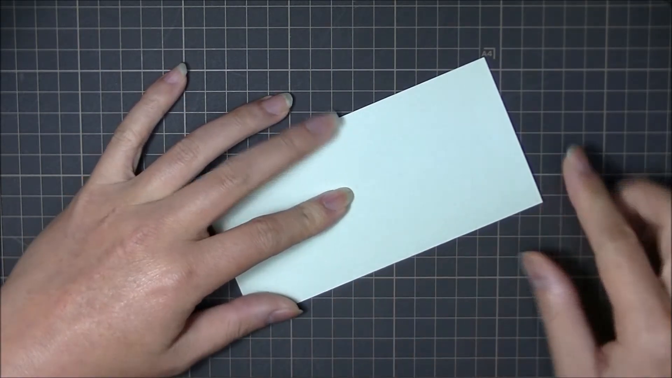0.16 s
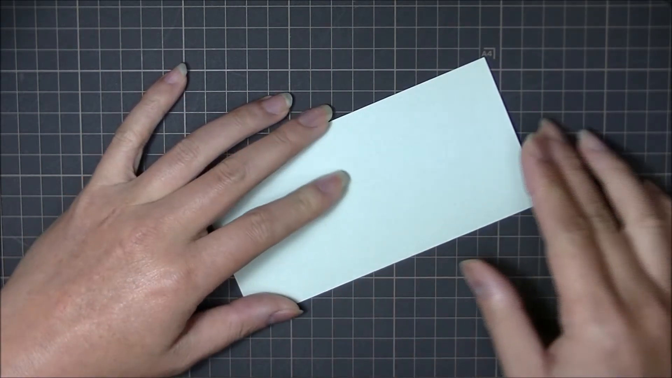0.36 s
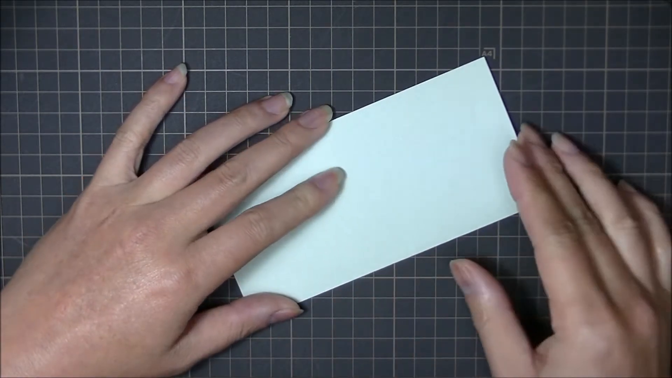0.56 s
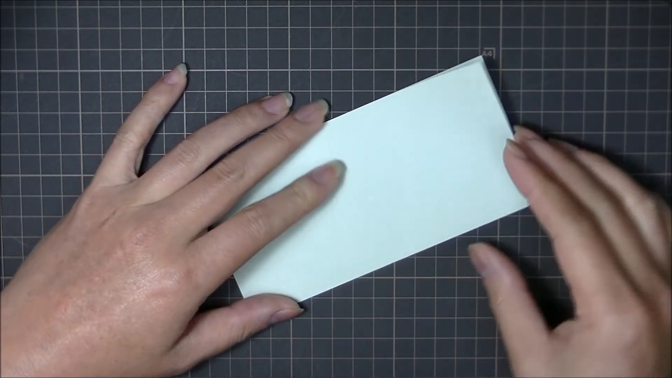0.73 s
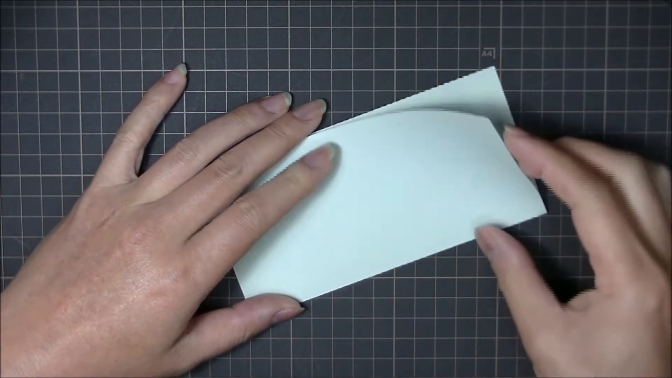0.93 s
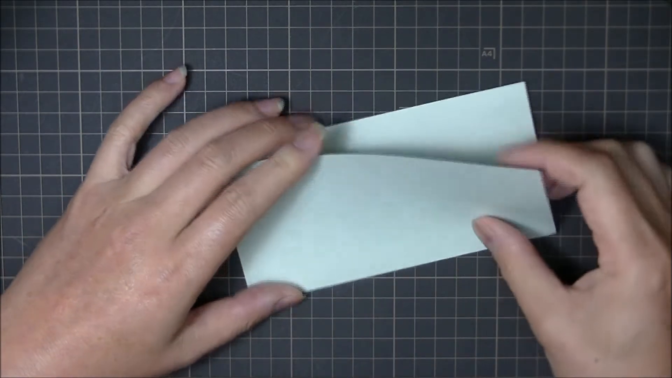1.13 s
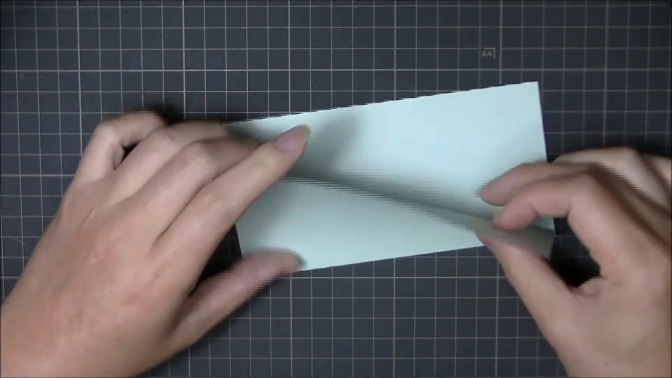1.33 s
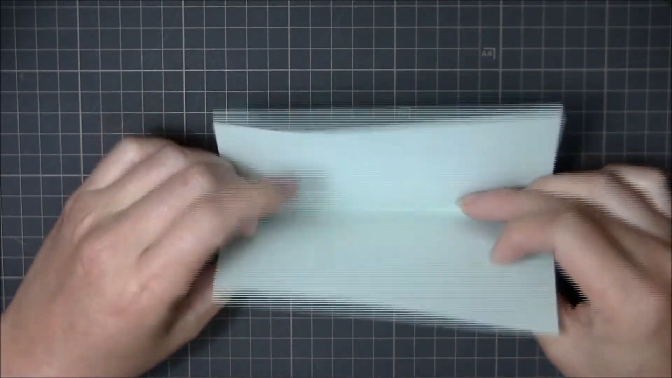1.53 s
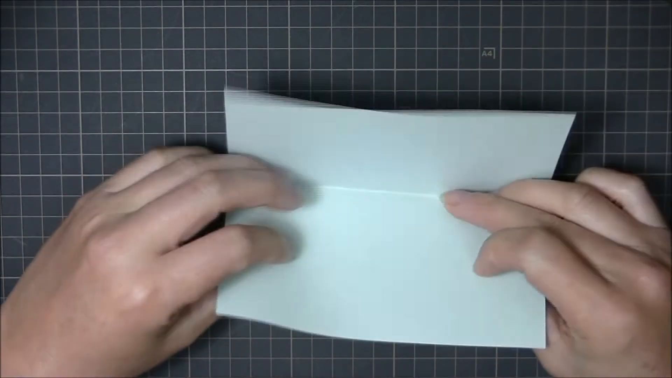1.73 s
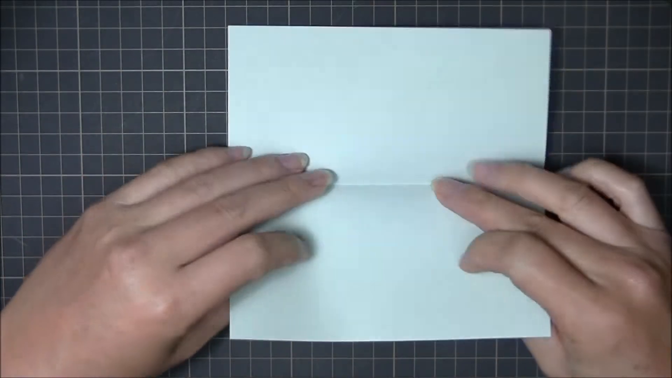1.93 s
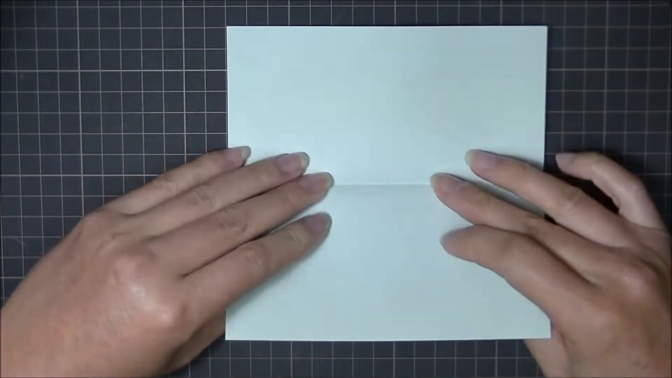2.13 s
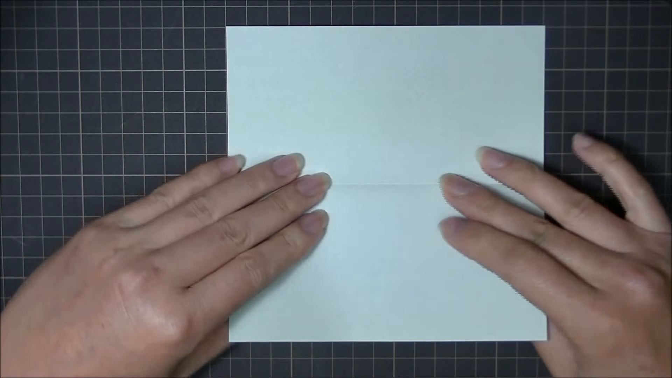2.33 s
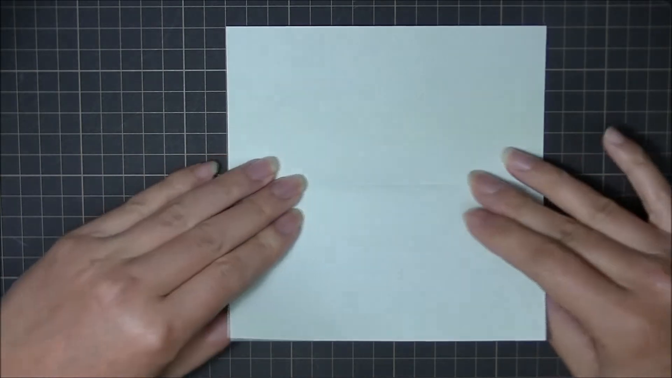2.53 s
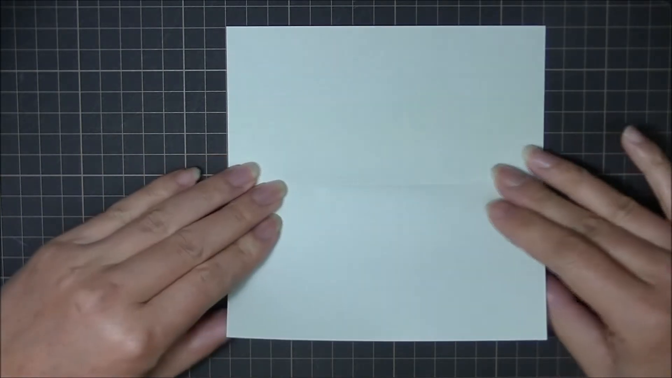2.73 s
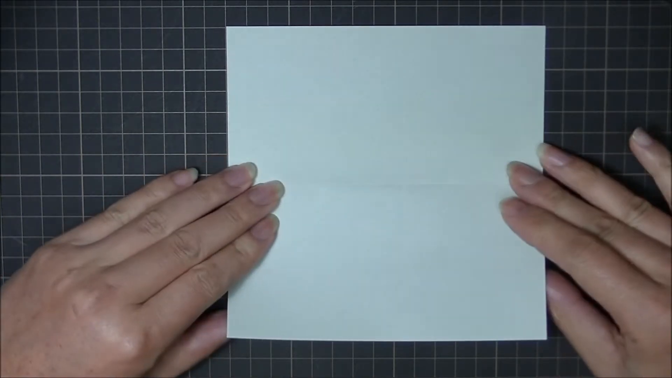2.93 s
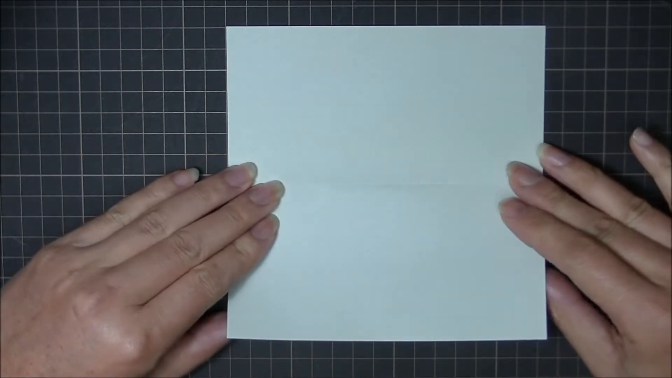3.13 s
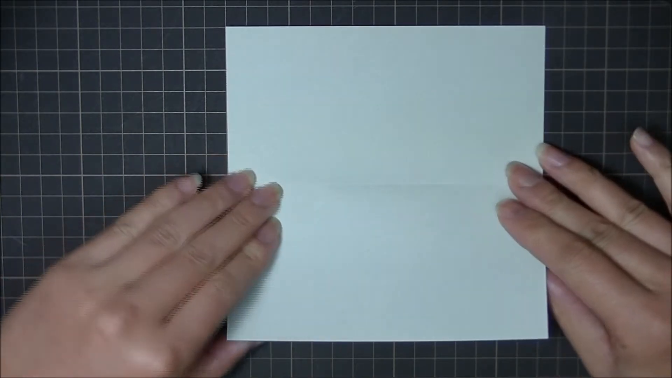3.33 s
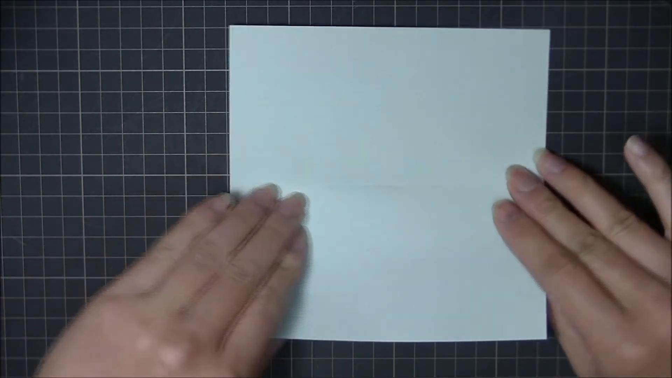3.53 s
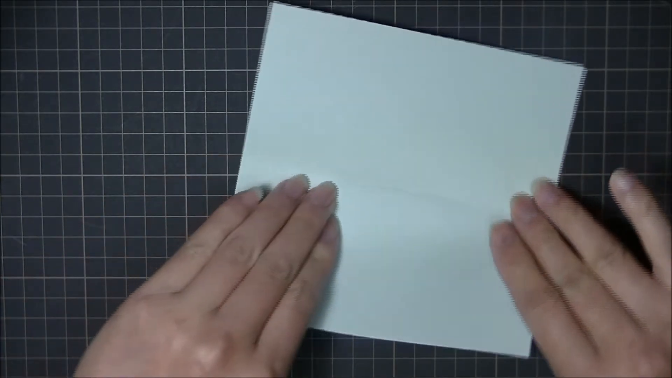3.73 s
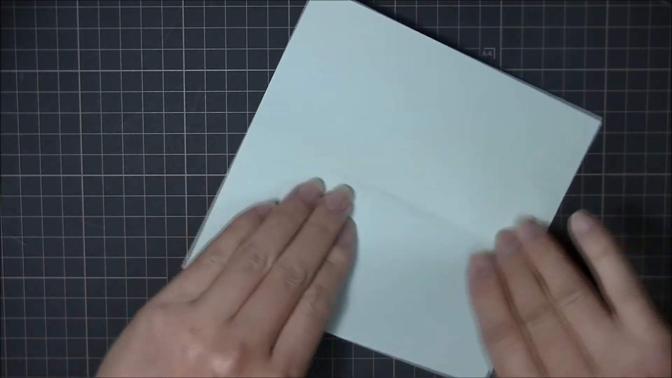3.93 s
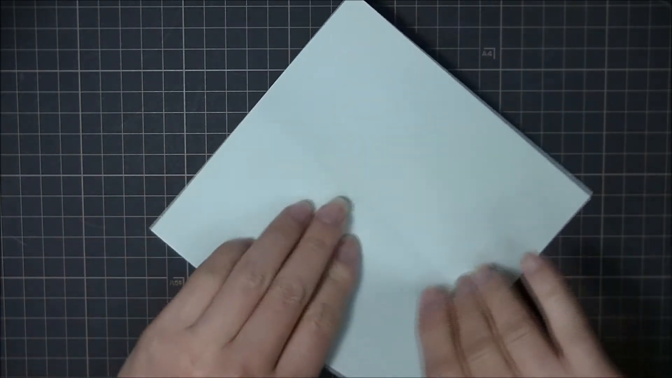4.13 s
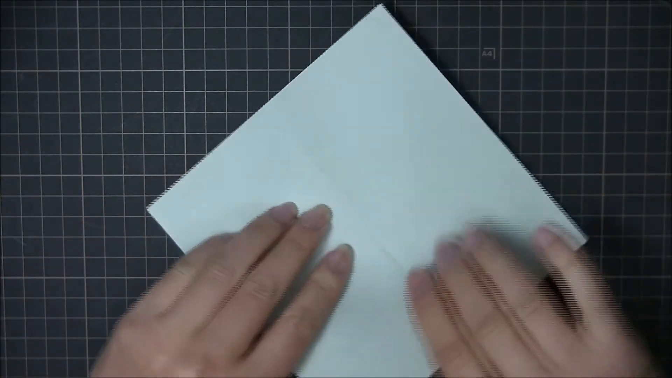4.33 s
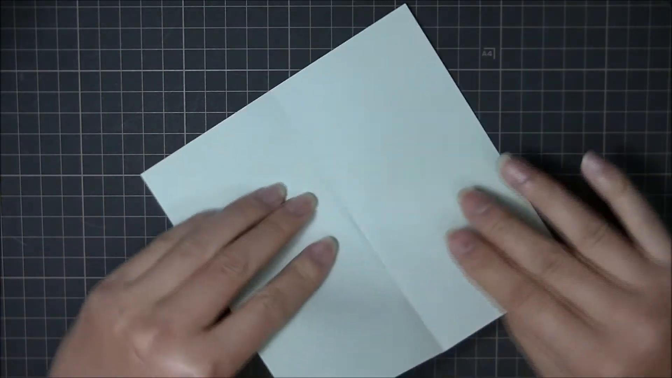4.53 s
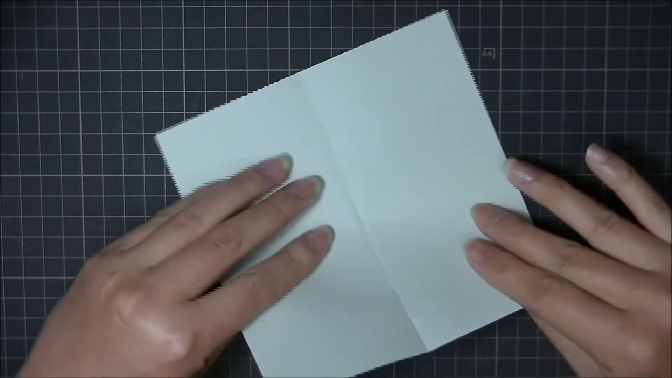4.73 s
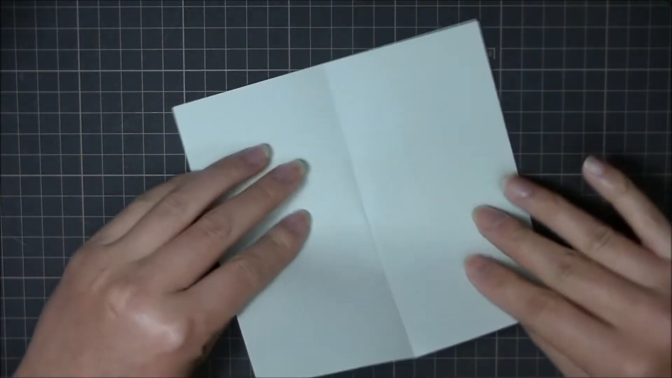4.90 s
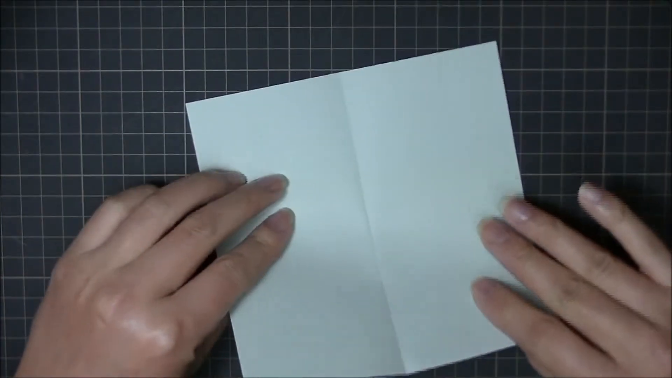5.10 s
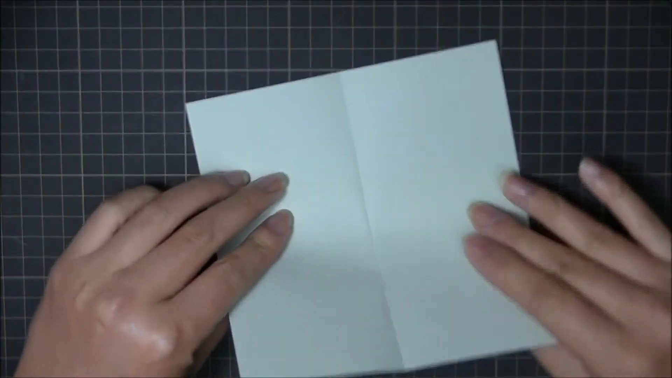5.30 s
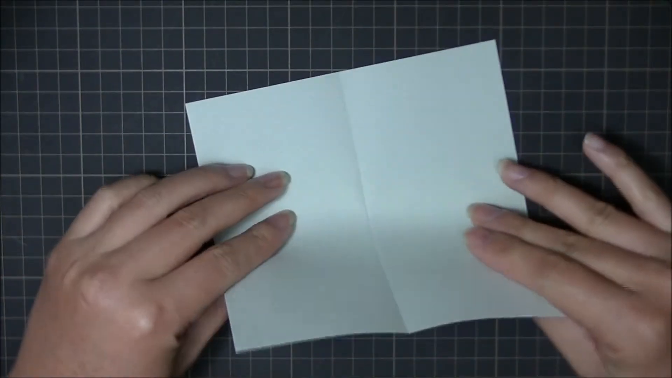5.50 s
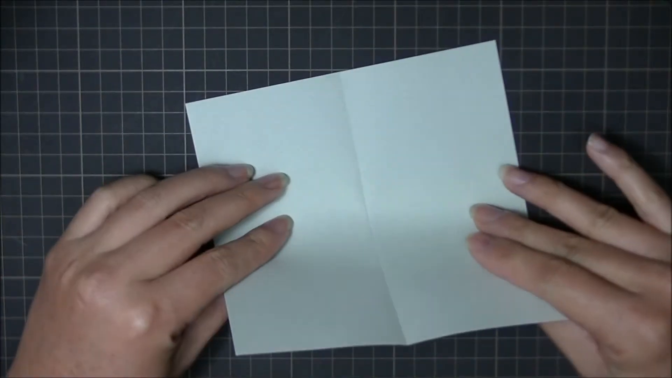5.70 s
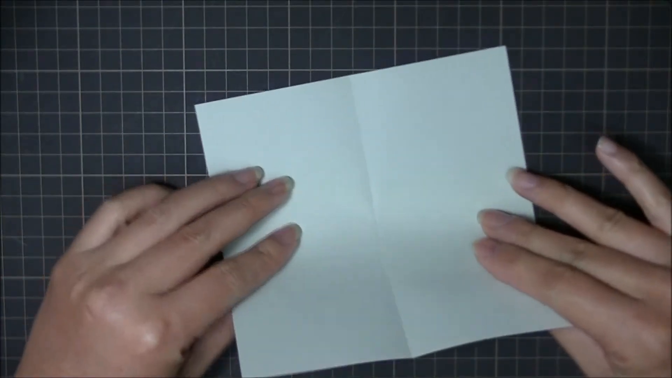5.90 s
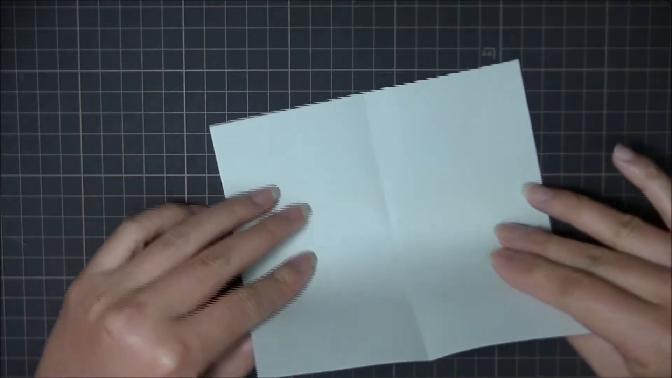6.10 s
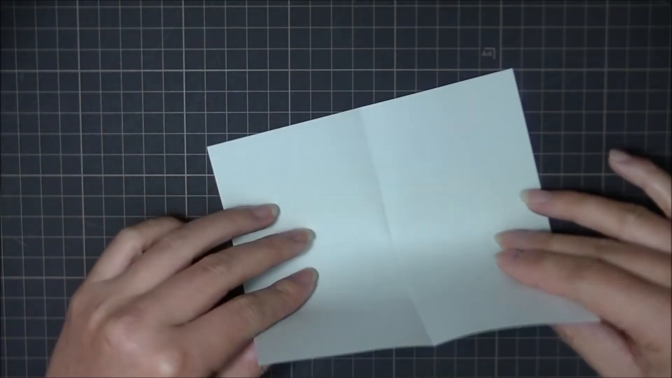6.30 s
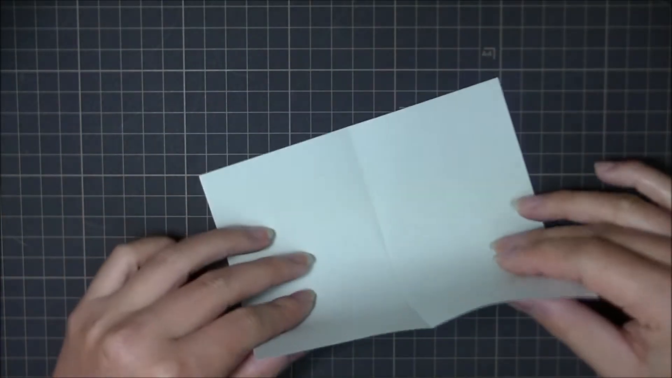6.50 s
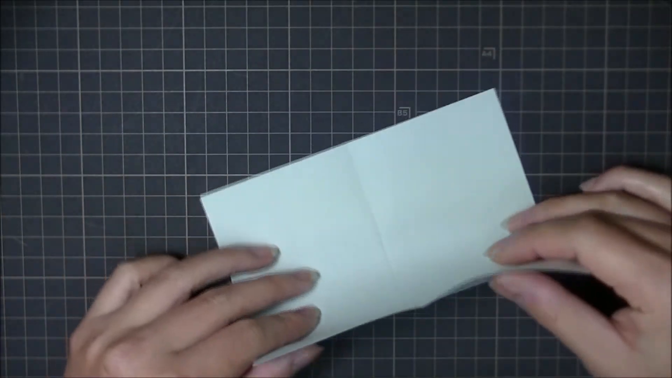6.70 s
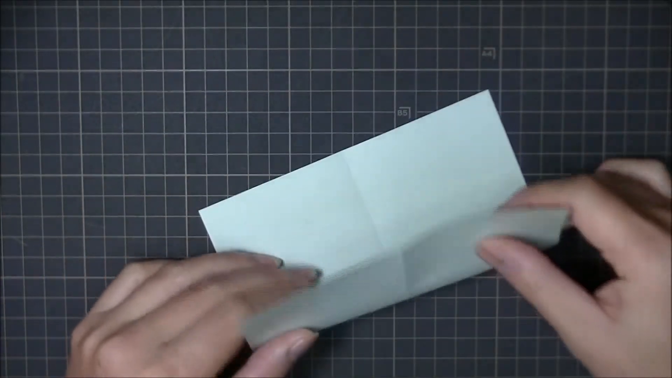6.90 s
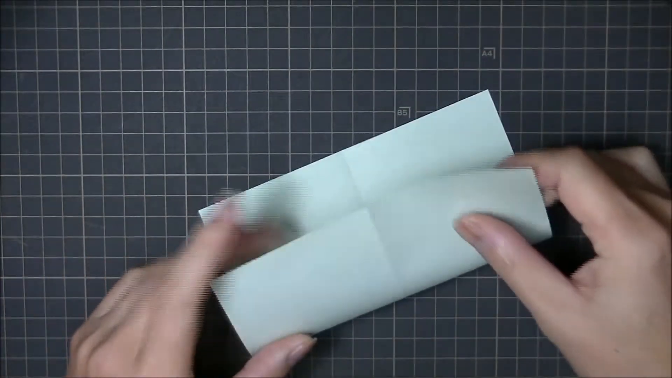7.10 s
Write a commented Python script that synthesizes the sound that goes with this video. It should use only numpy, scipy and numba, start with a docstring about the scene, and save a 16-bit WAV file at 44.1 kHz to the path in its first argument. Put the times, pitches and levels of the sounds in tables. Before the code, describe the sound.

Stiff paper rustles and crackles as it is lifted and opened, with one loud, crisp snap. Fingers rub it flat, pause briefly, then swivel it across a mat with a dry scrape and another pop. Softer brushing leads to a last run of rustles and ticks as an edge is folded over. The sound is near and slightly to the left, with a short room echo over low, steady hiss.

```python
"""Paper rustles, scrapes and snaps as hands lift, open, slide and turn a sheet on a cutting mat.
The rustle is thousands of tiny clicks from slipping fibres. Fingers scuff the edges, the stiff sheet
snaps as it buckles, and single fibres tick. Sheet, table and a small stereo camera microphone shape
the tone. A short room echo follows, and under it all lies a quiet hiss of room and microphone."""
import sys
import numpy as np
from scipy import signal
from scipy.fft import rfft, irfft
from scipy.io import wavfile
from scipy.ndimage import uniform_filter1d
from numba import njit

SR = 44100
rng = np.random.default_rng(int(sys.argv[2]) if len(sys.argv) > 2 else 0)


def unload_audio(sound):
    """Save the sound as a 16-bit wav file, at the path given as the first command line argument."""
    columns = np.transpose(np.atleast_2d(sound))
    # keep every value between -1 and 1, then stretch to whole-number steps
    steps = np.round(np.clip(columns, -1, 1) * 32767)
    wavfile.write(sys.argv[1], SR, steps.astype(np.int16))


N = 315315  # 7.15 s


def rubbing():
    """Slipping fibres shake the sheet: a low drumming, a brighter slipping sound and a fine hiss."""
    # two rings that move as the sheet bends and the hollow under the hands changes:
    # (time [s], drum pitch [Hz], drum ring level [dB], slip pitch [Hz], slip ring level [dB])
    hand_hollow = [(0, 850, 2, 3200, -5), (.25, 810, 9.5, 3200, 7), (.55, 880, 5, 4370, 12),
                   (.82, 990, -1, 4700, 9), (1.03, 1850, 6, 3450, -4), (1.4, 1920, 5.5, 4160, -13),
                   (1.58, 1250, 17.5, 3260, -5), (1.75, 1800, -3.5, 3380, 1.5), (2.5, 1520, 1, 3300, 4),
                   (3.7, 1480, 8, 3420, 13), (4.6, 1580, 5.5, 3070, -6), (4.87, 1620, 2, 3900, 3),
                   (5.25, 1600, -5, 3100, 13), (6.3, 1340, -3, 3400, 5), (6.8, 1230, -1, 3200, -5.5),
                   (6.92, 1970, -12.5, 3860, 2.5), (7.15, 890, 1, 3120, -6)]
    # where the fibre hiss is strongest: (time [s], pitch [Hz])
    hiss_pitch = [(0, 8600), (1.6, 7640), (2.5, 9900), (3.4, 8100), (4.1, 7300), (5.8, 9800), (7.15, 8700)]
    t = np.arange(N) / SR
    coarse_t = t[::32]
    slip_gain, drum_gain, hiss_gain = (np.interp(t, coarse_t, gain) for gain in hand_effort(coarse_t))
    drum_hz, drum_ring_db, slip_hz, slip_ring_db = follow(hand_hollow, t)
    hiss_hz, = follow(hiss_pitch, t)
    paper = apply_tone(fibre_slips(N, per_s=9000, spread_db=1.5), paper_tone_db)
    paper = bending(paper, bins=3, frames=8, spread_db=2.5)
    paper = bending(paper, bins=24, frames=10, spread_db=1.1)
    drum = add_ring(band(paper, 289, 2604, order=3), drum_hz, width=0.31, ring_db=drum_ring_db)
    slip = add_ring(band(paper, 2080, 6940, order=3), slip_hz, width=0.4, ring_db=slip_ring_db)
    hiss = add_ring(band(paper, 6060, 14000, order=3), hiss_hz, width=0.46, ring_db=10)
    # uneven pressure: each part flickers a little alone, then all together
    drum = drum * drum_gain * undb(0.83 * waver(30))
    slip = slip * slip_gain * undb(0.46 * waver(30))
    hiss = hiss * hiss_gain * undb(0.73 * waver(30))
    return (drum + slip + hiss) * undb(0.81 * waver(45))


def hand_effort(t):
    """How loud the hands make slip, drum and hiss: long moves with quick swipes added on top."""
    # steady rubbing, one list a move: settle on the folded sheet, lift and open it, smooth the crease,
    # turn it on the mat, bend the near edge over:
    # (time [s], slip level [dB], drum above slip [dB], hiss above slip [dB])
    moves = [
        [(0, -81, 14, 4), (.1, -79, 4, -1), (.2, -63, 4, -8), (.37, -60, 3.5, -18), (.5, -60, -1, -19),
         (.57, -73.5, -2, -16), (.75, -71.5, -1, -11)],
        [(.85, -67, -7, -14), (1.0, -68, -8, -8), (1.07, -55, -1.5, -13), (1.33, -59, 5.5, -18),
         (1.46, -56, 6.5, -13), (1.63, -56, 9, -17), (1.77, -49, 2.5, -15), (1.97, -56, -1.5, -13),
         (2.13, -55.5, -0.5, -13.5), (2.28, -65, -3, -15)],
        [(2.35, -61.5, -6, -10), (2.41, -53, -8.5, -11), (2.6, -55, -11, -10), (2.66, -60, -9, -7),
         (2.88, -63, -6, -8), (2.92, -78.5, 4, -8)],
        [(3.24, -79, 0, -10), (3.3, -66, -10, -16), (3.44, -66, -10, -18), (3.57, -52, -10, -7),
         (3.81, -50, -3, -7), (4.11, -39, -8, -8), (4.24, -51, -11, -5.5), (4.36, -56.5, 4, -7.5),
         (4.43, -48, -1, -8), (4.59, -46, -3, -9.5), (4.62, -54.5, -1, -7), (4.78, -59, 3, -6),
         (5.0, -57.5, 0, -3), (5.24, -57.5, -4, -10.5), (5.31, -69, -4, -12), (5.69, -69, -2, -11),
         (5.79, -79, 6, 1)],
        [(5.83, -67, -6, -9), (5.845, -59, 2, -7), (6.08, -43, -3.5, -11.5), (6.29, -49, 0, -13),
         (6.38, -54, -2, -8), (6.58, -55, 1, -15), (6.64, -60, 3, -17), (6.71, -54, 1, -11),
         (6.86, -60, 7, -14), (6.98, -64, 1.5, -5), (7.11, -56, -4, -4), (7.15, -71, 0.5, -9)],
    ]
    # paper swiping over paper or mat: (peak time [s], slip level [dB], rise [s per 10 dB], hold [s],
    # fall [s per 10 dB], drum above slip [dB], hiss above slip [dB])
    swipes = [(.118, -64, .015, .01, .02, 2, -2), (.27, -47.5, .06, 0, 0.0248, -6.5, -11.5),
              (.39, -56.5, 0.06, 0, .05, -3.5, -15), (.79, -64, 0, 0, -0.1, -20, -20),
              (.864, -61.5, 0.04, 0, 0, -10, -13), (1.034, -42, .012, .01, .04, -14, -16),
              (1.122, -35, .015, 0.001, .05, -12, -13.5), (1.258, -39, 0.0358, 0.00092, 0.05, -9, -16.5),
              (1.356, -45, 0.01, 0.025, 0.04, -15, -19), (1.397, -40, 0.0272, 0.00083, .025, 1.5, -10.5),
              (1.535, -43, .012, 0, .05, -2, -9), (1.572, -27.5, .02, .006, .017, -12, -12),
              (1.699, -52.5, .03, 0.0068, .01, 0, 1.5), (1.736, -40, .006, .017, .008, 4, -18),
              (1.86, -51.5, .08, 0.0075, .06, -4, -6.5), (1.933, -45, 0.0257, 0, .03, -4, -13.5),
              (2.047, -44, .06, 0.00072, .04, -3, -10.5), (2.118, -50, .008, .01, .06, -1, -13),
              (2.638, -58.5, .02, 0, 0.0347, -14, -14), (3.282, -60, .03, 0, .03, -8, -13),
              (3.385, -55, -0.06, .02, .02, -15, -13.5), (3.474, -55, .03, .02, 0, -14, -15),
              (3.782, -49, 0.05, 0, -0.04, -4, -6), (4.262, -46, .01, .045, .025, 2, -11),
              (4.406, -44.5, .02, 0, 0.06, -8, -16), (4.632, -45, .01, 0.099, .03, -5.5, -8.5),
              (4.858, -46, 0.07, 0, .06, -11, -8), (5.014, -51, 0.06, 0.0024, 0.03, -6.5, -6),
              (5.076, -52.5, 0.04, 0.0031, .07, -3, -8), (5.165, -51, 0.05, 0, 0.09, -2, -12),
              (5.243, -52, .015, .01, .02, -7, -2.5), (5.28, -59, .01, .02, .01, -3, -4),
              (5.376, -55.5, -0.05, 0.0017, .045, -1, -10), (5.42, -66, .01, 0, .015, -3, 2),
              (5.454, -61, .025, 0.0026, .035, -8, -14), (5.506, -64, 0.1, 0, .15, -3, -9),
              (5.72, -62, .015, 0, .02, -3, -14), (6.473, -44.5, 0.0542, 0.026, .06, -2, -13.5),
              (6.674, -51, 0.03, 0, 0.08, 2, -8), (6.756, -40.5, 0.0232, .05, .024, -4, -16),
              (6.893, -47, -0.01, 0.00076, .035, 0, -8.5), (7.128, -43, .008, .004, .008, -5.5, -9)]
    slip_db, drum_db, hiss_db = follow(np.concatenate(moves), t)
    slip_power = undb(2 * slip_db)  # doubling the dB gives power, which can be summed
    drum_power = slip_power * undb(2 * drum_db)
    hiss_power = slip_power * undb(2 * hiss_db)
    for peak_s, peak_db, rise, hold, fall, low_db, high_db in swipes:
        drop_db = 10 * np.maximum((peak_s - t) / abs(rise), (t - peak_s - hold) / abs(fall)).clip(0)
        power = undb(2 * (peak_db - drop_db))
        slip_power += power
        drum_power += power * undb(2 * low_db)
        hiss_power += power * undb(2 * high_db)
    return np.sqrt([slip_power, drum_power, hiss_power])


def fibre_slips(samples, per_s, spread_db):
    """Fibres slip with clicks at random moments, a few much larger than most."""
    chance, direction, size = rng.random((3, samples))
    strength = undb(-spread_db * np.log(1 - size))
    return (chance < per_s / SR) * np.sign(direction - .5) * strength


def paper_tone_db(hz):
    """Sheet, table and microphone pass some pitches better than others."""
    # the broad tone they let through: (frequency [Hz], gain [dB])
    broad_tone = [(120, -78), (200, -15.5), (378, -20), (497, -12), (665, -11), (728, -7), (1030, -4.5),
                  (1350, -8), (1780, -3.5), (2170, -4.5), (3360, 0), (5390, -5.5), (6470, -21.5),
                  (9310, -18.5), (15500, -23)]
    # narrow rings of sheet and table: (frequency [Hz], width [Hz], gain [dB])
    rings = [(499.4, 38, 6), (635, 130, 0), (743, 25, 5), (1110, 87, 0), (1252, 23, 6.5), (1350, 31, 0),
             (1482, 23, 5.5), (1703, 21, 2.5), (1946, 41, 3), (2140, 110, -0.5), (3050, 130, 4),
             (3480, 200, -2), (5380, 170, -4), (6400, 770, -0.5), (7620, 1300, 2.5)]
    rings_db = sum(db / (1 + (2 * (hz - centre) / width) ** 2) for centre, width, db in rings)
    return curve_db(broad_tone, hz) + rings_db


def bending(x, bins, frames, spread_db):
    """Rings come and go as the sheet bends: random gain over small patches of pitch and time."""
    spectrum = signal.stft(x, nperseg=1024, noverlap=768)[2]
    patches = uniform_filter1d(rng.standard_normal(spectrum.shape), bins, axis=0)
    patches = uniform_filter1d(patches, frames, axis=1)
    gain = undb(spread_db * patches / patches.std())
    return signal.istft(spectrum * gain, nperseg=1024, noverlap=768)[1][:len(x)]


def add_ring(x, hz, width, ring_db):
    """Add a ring of moving pitch, then even out the loudness over a third of a second."""
    ringing = x + undb(ring_db) * moving_band(x, hz, width)
    return ringing / np.sqrt(uniform_filter1d(ringing ** 2, SR // 3))


def scuffs():
    """A finger scuffs an edge: a cluster of fibre slips swells and dies away."""
    # finger scuffs: (time [s], peak level [dB], pitch [Hz])
    touches = [(0.116, -50.5, 850), (0.266, -41, 2800), (0.78, -53, 4570), (0.869, -53, 2940),
               (1.045, -37, 4200), (1.145, -31.5, 1850), (1.17, -31.5, 4270), (1.361, -31.5, 3860),
               (1.389, -30.5, 4500), (1.566, -36, 3540), (1.578, -20.5, 1310), (1.661, -41, 1430),
               (1.742, -30, 1750), (2.044, -38, 2960), (2.113, -39, 1900), (4.398, -36, 3520),
               (4.597, -35.5, 1520), (4.625, -33, 3050), (5.25, -48, 3160), (6.981, -48.5, 1270),
               (7.123, -44, 5000), (7.132, -39, 816)]
    rise_s, fall_s, samples = .0024, .007, 8192
    out, t = np.zeros(N + samples), np.arange(samples) / SR
    swell = (1 - np.exp(-t / rise_s)) * np.exp(-t / fall_s)
    for time_s, db, hz in touches:
        start = int(time_s * SR)
        cluster = fibre_slips(samples, per_s=7000, spread_db=3) * swell
        out[start:start + samples] += sheet_burst(cluster, hz, edge_ratio=1.22, broad_db=-1, peak_db=db)
    return out[:N]


def snaps():
    """A buckle flips: one sharp push rings a high and a low patch of the sheet and knocks the table."""
    # snaps of the stiff sheet: (time [s], high peak level [dB], high pitch [Hz], low above high [dB])
    buckles = [(0.387, -44, 4400, -16), (0.399, -46, 3180, -14), (0.435, -48, 3180, -18),
               (0.474, -53, 4120, -11), (0.796, -43, 4400, -28), (1.029, -38, 3250, -20),
               (1.109, -38.5, 3480, -11), (1.123, -27, 3370, -11), (1.705, -33, 3490, -2.5),
               (1.724, -12, 4300, -12), (1.999, -40, 3050, -18), (2.245, -46.5, 3000, -9),
               (4.25, -16.5, 3350, 0), (5.372, -44.5, 3150, -17), (5.385, -51, 3240, -8),
               (5.496, -41, 4000, -21), (5.698, -37, 3900, -18), (5.839, -47.5, 3570, -9),
               (6.882, -32, 3750, -6), (6.888, -33, 2950, -8)]
    low_hz, knock_db, samples = 1800, -21, 4096
    out, t = np.zeros(N + samples), np.arange(samples) / SR
    knock = set_peak(band(signal.unit_impulse(samples), 400, 570), knock_db)
    for time_s, db, high_hz, low_db in buckles:
        fade_s = .007 + .022 * undb(low_db)  # snaps with a strong low ring rattle longer
        push = 0.33 * rng.standard_normal(samples) * fade(t, fade_s)
        push[0] = 1
        push = band(push, 300, 6400)  # the push lasts a moment, which dulls it
        low_ring = set_peak(band(push, low_hz / 1.21, low_hz * 1.136), 0)
        high_ring = sheet_burst(push, high_hz, edge_ratio=1.28, broad_db=-6, peak_db=db)
        start = int(time_s * SR)
        out[start:start + samples] += high_ring + undb(db + low_db) * (low_ring + knock)
    return out[:N]


def sheet_burst(push, hz, edge_ratio, broad_db, peak_db):
    """A push makes the sheet ring around one pitch, along with a broad rustle in the paper's tone."""
    rustle = band(apply_tone(push, paper_tone_db, size=1024), 800, 9600)
    ring = band(push, hz / edge_ratio, hz * edge_ratio)
    return set_peak(set_level(ring, 0) + set_level(rustle, broad_db), peak_db)


def ticks():
    """A single fibre lets go: a thin, high tick about a millisecond long."""
    # fibres letting go: (time [s], peak level [dB])
    releases = [(1.8108, -41), (2.1296, -46), (6.8808, -40), (6.889, -36), (6.8954, -49), (6.9034, -43),
                (6.9094, -47)]
    out, samples = np.zeros(N), 256
    decay = np.exp(-np.arange(samples) / 25)
    for time_s, db in releases:
        start = int(time_s * SR)
        tick = band(rng.standard_normal(samples) * decay, 6700, 14500)
        out[start:start + samples] += set_peak(tick, db)
    return out


def stereo(rustle, accents):
    """The paper lies a little left; rustle comes from all over it, so each side hears it differently."""
    # how much louder the paper is on the left: (frequency [Hz], left minus right [dB])
    lean = [(200, -3), (1500, 1), (4000, 1.4), (8000, 0.8), (14000, -1.5)]
    # the share of rustle that differs between the sides: (frequency [Hz], gain [dB])
    apart = [(200, -31), (600, -5.5), (1400, -11), (3500, -18), (7000, 2), (14000, -9.5)]
    side = apply_tone(rustle, lambda hz: curve_db(apart, hz), size=1024) * waver(120)
    left = apply_tone(rustle + accents, lambda hz: curve_db(lean, hz) / 2, size=256)
    right = apply_tone(rustle + accents, lambda hz: -curve_db(lean, hz) / 2, size=256)
    return np.array([left + side, right - side])


def room(channels):
    """The sound bounces once off the table, then leaves a short, dull room echo on each side."""
    room_db, fade_s, bounce_s, bounce_db = -26, .24, .004, -22
    t = np.arange(int(.4 * SR)) / SR
    out = []
    for channel in channels:
        echo = band(rng.standard_normal(len(t)), 250, 6000) * fade(t, fade_s) * (t > .006)
        echo *= undb(room_db) / np.sqrt(np.sum(echo ** 2))
        echo[0] = 1  # the direct sound
        echo[int(bounce_s * SR)] += undb(bounce_db)
        out.append(signal.oaconvolve(channel, echo)[:N])
    return np.array(out)


def background():
    """Room air and the microphone's own hiss, wavering slightly."""
    # hiss that both sides share: (frequency [Hz], relative level [dB])
    shared_tone = [(25, -10.5), (100, -11), (190, -9.5), (330, 0.5), (700, 4), (1200, 2.5), (2200, -2.5),
                   (4300, -5.5), (6500, -8), (9000, -10.5), (15500, -14.5)]
    # hiss that is opposite on the two sides: (frequency [Hz], relative level [dB])
    side_tone = [(25, 1.5), (100, -8.5), (250, -1), (500, 6), (1200, 2), (2400, -3), (4000, -6.5),
                 (8000, -10), (15500, -24)]
    shared = set_level(apply_tone(rng.standard_normal(N), lambda hz: curve_db(shared_tone, hz)), db=-66)
    side = set_level(apply_tone(rng.standard_normal(N), lambda hz: curve_db(side_tone, hz)), db=-65)
    return np.array([shared + side, shared - side]) * undb(.5 * waver(3.7))


def undb(db):
    """Turn decibels into a factor to multiply by."""
    return 10 ** (np.asarray(db) / 20)


def set_level(x, db):
    """Scale to an average (rms) level."""
    return x * undb(db) / np.sqrt(np.mean(x ** 2))


def set_peak(x, db):
    """Scale to a peak level."""
    return x * undb(db) / np.abs(x).max()


def fade(t, fade_s):
    """A decay that falls 60 dB in fade_s seconds."""
    return np.exp(-np.log(1000) * t / fade_s)


def waver(per_s):
    """A smooth random wobble around zero, with per_s new values a second."""
    hold = int(SR / per_s)
    steps = np.repeat(rng.standard_normal(N // hold + 1), hold)
    return 0.69 * uniform_filter1d(uniform_filter1d(steps, hold), hold)[:N]


def follow(table, t):
    """Join the rows of a time table with straight lines, one curve for each value column."""
    times, *columns = np.transpose(table)
    return [np.interp(t, times, column) for column in columns]


def curve_db(table, hz):
    """Read a tone table at any pitch, with straight lines on a log-frequency axis."""
    table_hz, db = np.transpose(table)
    return np.interp(np.log(hz + 1), np.log(table_hz + 1), db)


def apply_tone(x, db_at, size=4096):
    """Filter by a curve of dB against Hz, ringing only after each click (minimum phase)."""
    hz = np.arange(size // 2 + 1) * SR / size
    cepstrum = irfft(db_at(hz) * np.log(10) / 20)
    cepstrum[1:size // 2] *= 2
    cepstrum[size // 2 + 1:] = 0
    click_response = irfft(np.exp(rfft(cepstrum)))
    return signal.oaconvolve(x, click_response)[:len(x)]


def band(x, lo_hz, hi_hz, order=2):
    """Keep the pitches between lo_hz and hi_hz."""
    return signal.sosfilt(signal.butter(order, [lo_hz, hi_hz], "band", fs=SR, output="sos"), x)


@njit
def moving_band(x, hz, width):
    """Keep a band around a moving pitch; width is a fraction of that pitch."""
    out, band_state, low_state = np.empty(len(x)), 0., 0.
    for i in range(len(x)):
        tuning = np.tan(np.pi * hz[i] / SR)
        passed = (band_state + tuning * (x[i] - low_state)) / (1 + tuning * (tuning + width))
        band_state = 2 * passed - band_state
        low_state += 2 * tuning * passed
        out[i] = width * passed
    return out


def scene():
    """The handled paper in a small room, over quiet hiss."""
    paper = stereo(rustle=rubbing(), accents=scuffs() + snaps() + ticks())
    return room(paper) + background()


def record(dry):
    """The camera cuts off the highest treble steeply."""
    top_hz = 15450
    return signal.sosfilt(signal.ellip(10, .2, 80, top_hz, fs=SR, output="sos"), dry)


dry = scene()
out = record(dry)
unload_audio(out)
```